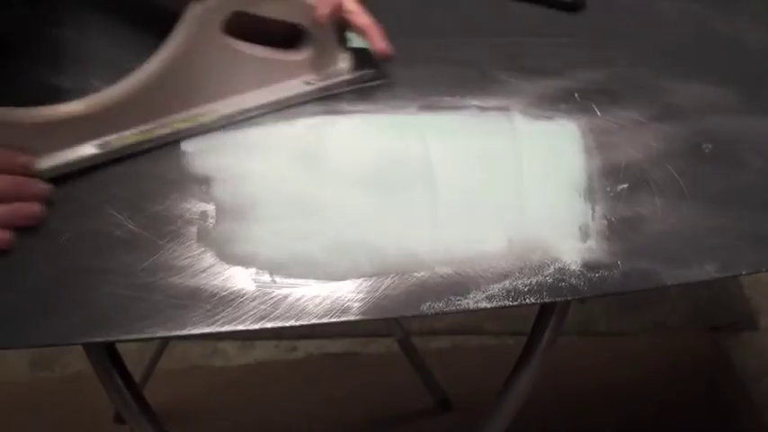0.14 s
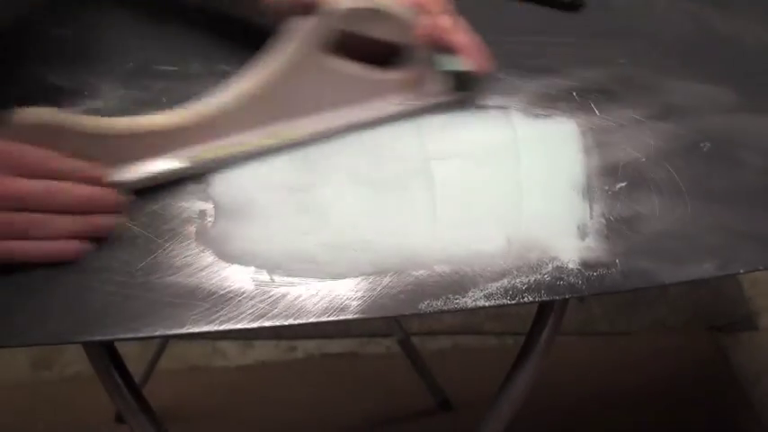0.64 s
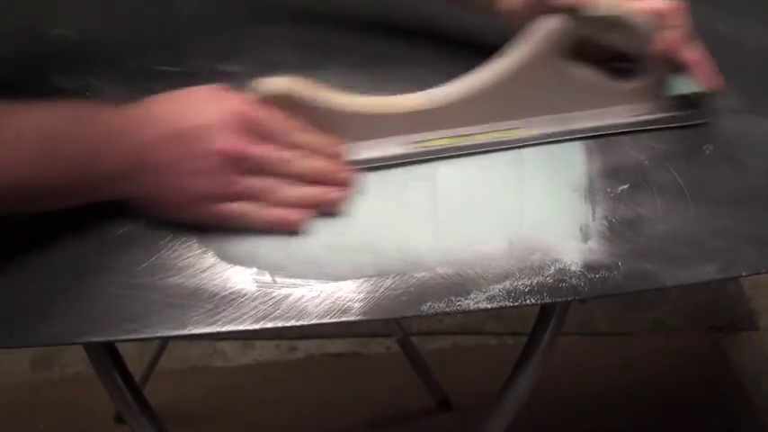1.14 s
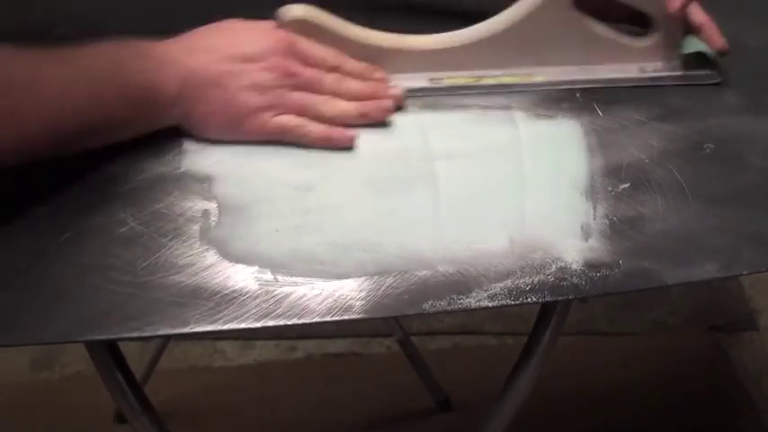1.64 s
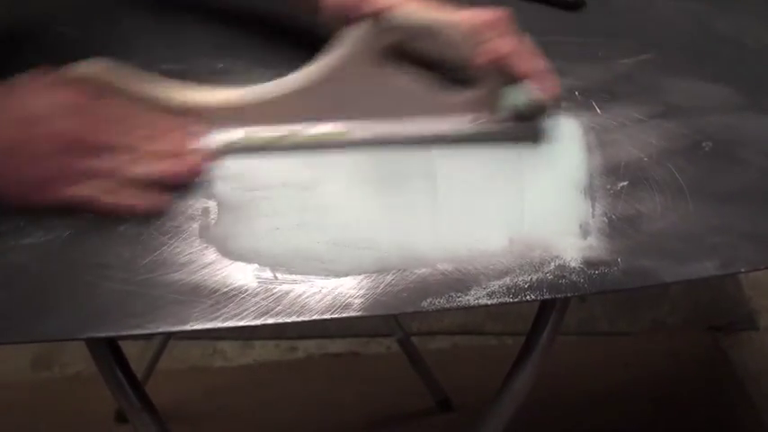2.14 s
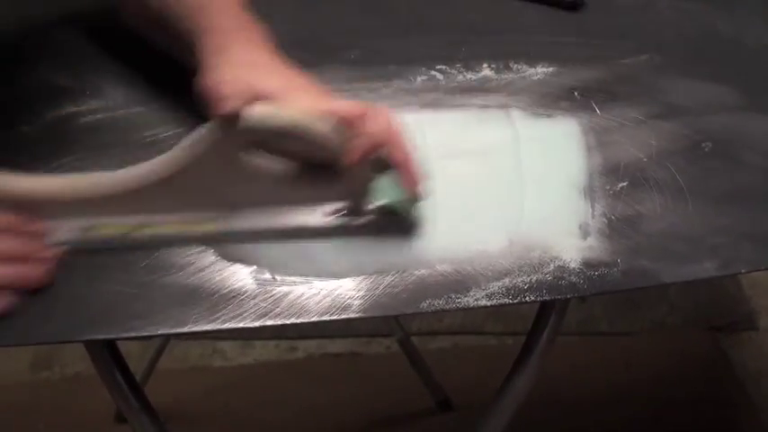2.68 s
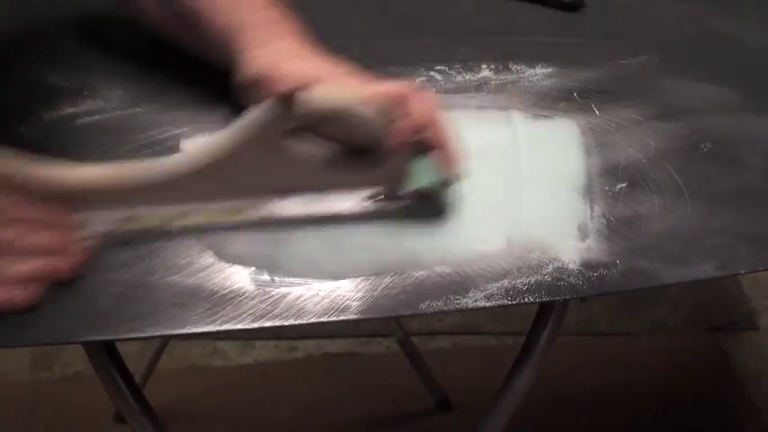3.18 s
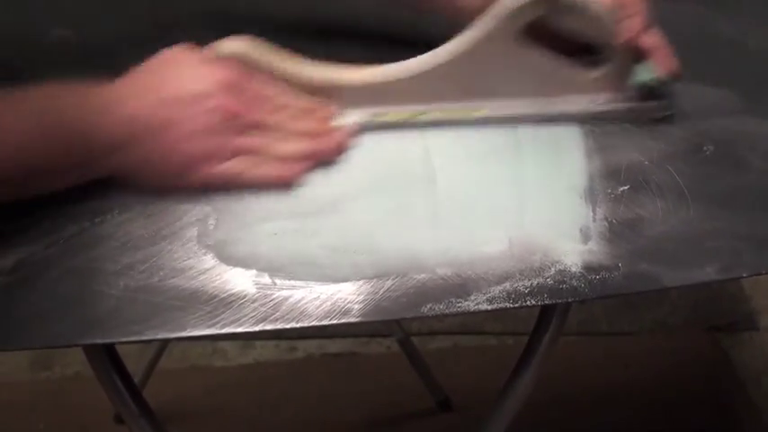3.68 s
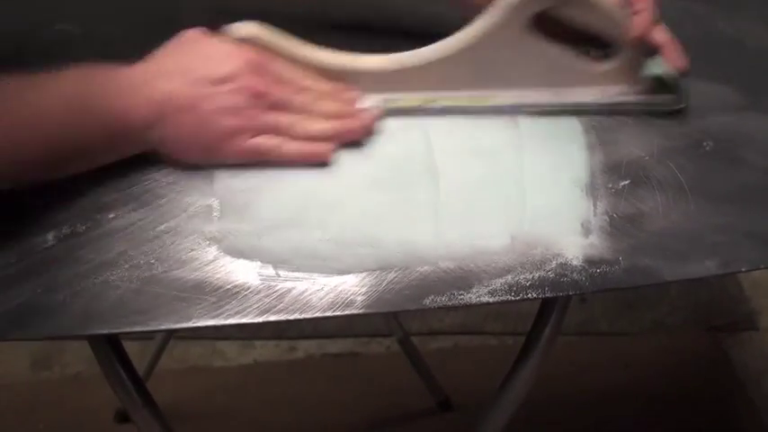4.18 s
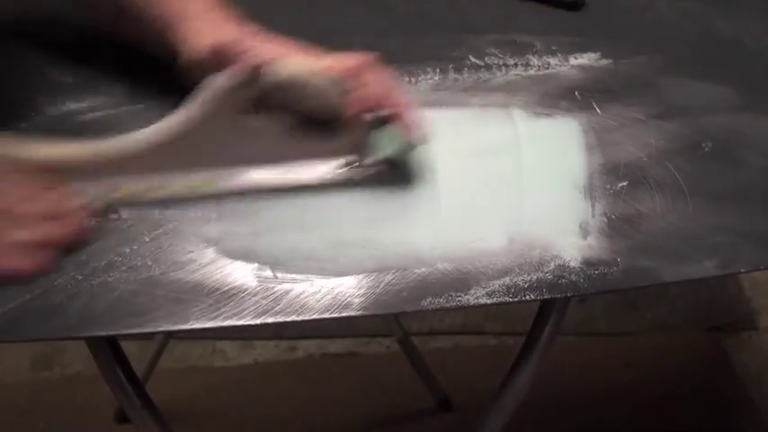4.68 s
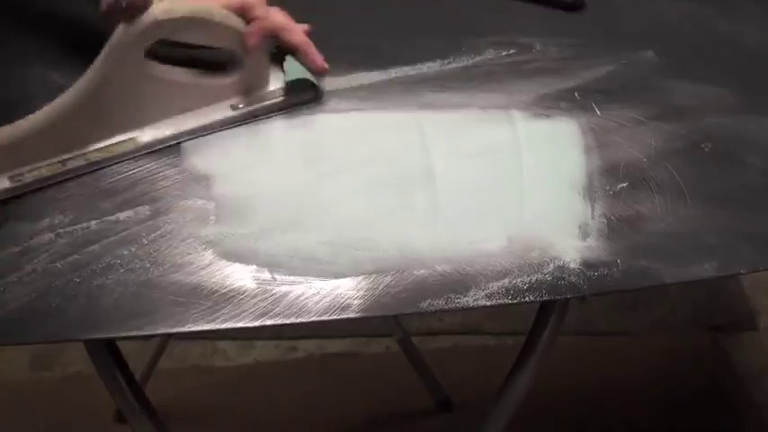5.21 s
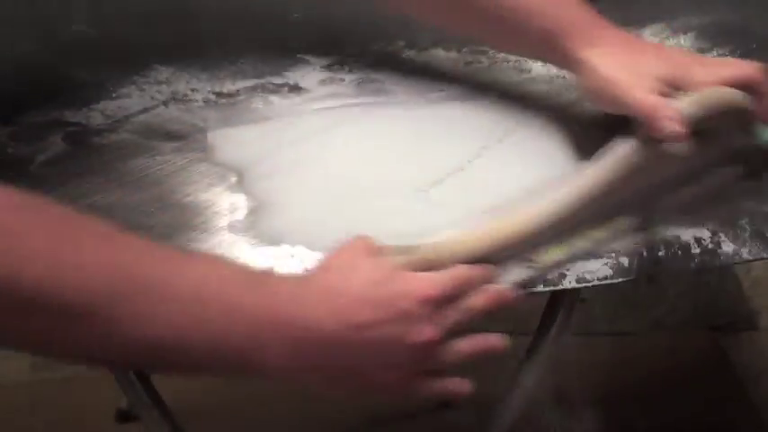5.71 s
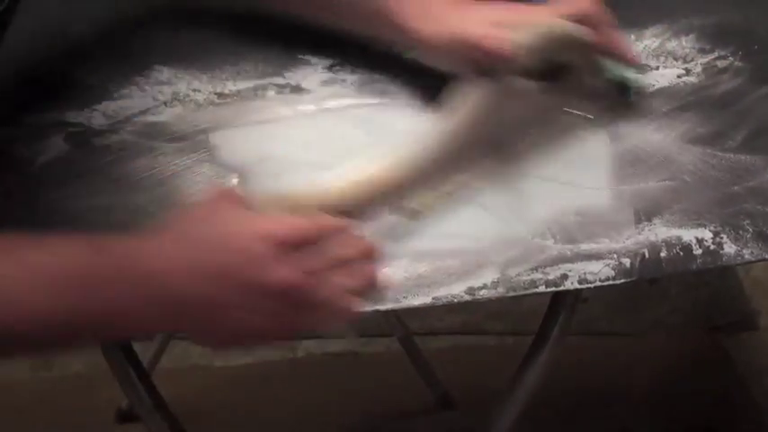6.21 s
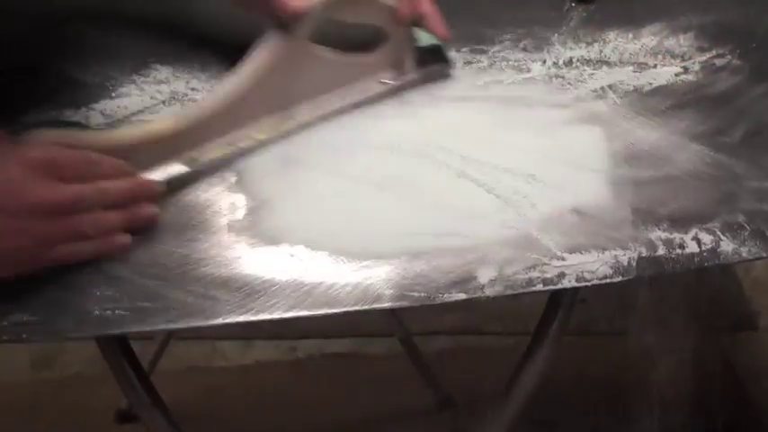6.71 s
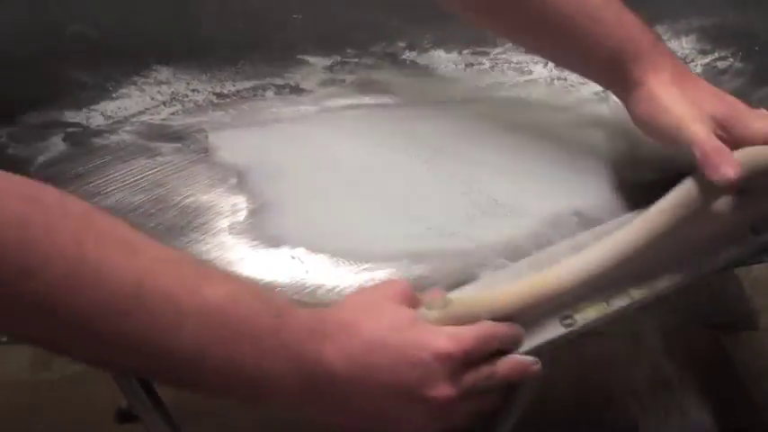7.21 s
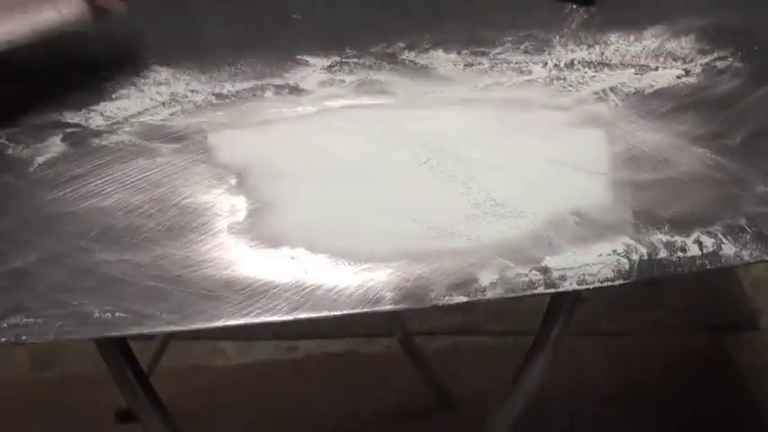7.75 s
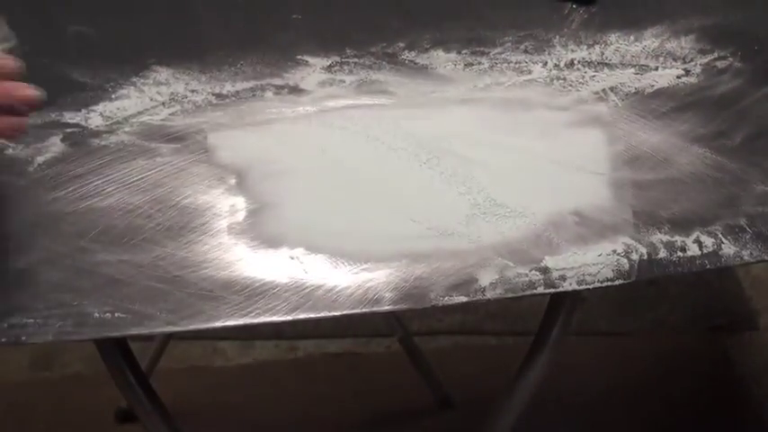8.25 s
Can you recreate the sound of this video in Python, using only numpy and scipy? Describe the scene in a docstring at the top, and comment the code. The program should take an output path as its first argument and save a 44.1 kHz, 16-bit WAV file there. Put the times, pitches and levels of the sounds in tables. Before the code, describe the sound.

In a small workshop, heard close up, coarse grit scrubs steadily across filled sheet metal, each stroke swelling and dipping at the turn. Brief squealing scrapes and a few sharp clacks poke through, with a faint humming stand beneath. The strokes soften, stop, and the tool is laid aside with light knocks, a clear clack, a dull thud and a short drag.

```python
"""Workshop: a long sanding block is pushed and pulled over hardened filler on a sheet-metal panel. Noise broken
up by random grit catches, banded and levelled along each stroke, gives hiss, rasp and rumble; narrow noise
gives passing squeals, and two wavering sines the hum of the stand. A few clacks (noise into ringing modes)
sound during the strokes, more as the block is lifted and laid aside with a soft thud. Last, something is
dragged nearby, one knock thudding low; diffuse echoes and steady air noise surround it all."""
import sys
import numpy as np
from scipy import signal
from scipy.io import wavfile

SR = 44100
rng = np.random.default_rng(int(sys.argv[2]) if len(sys.argv) > 2 else 0)


def boost(x):
    """Linear amplitude factor 10**(x/20) for a level x in decibels (scalar or array-like)."""
    u = np.asarray(x, float) / 20
    return 10 ** u


def transcribe(signal):
    """Save signal, clipped to [-1, 1], as a 16-bit WAV file at the path in sys.argv[1]."""
    frames = np.atleast_2d(signal).T
    limited = np.clip(frames, -1, 1)
    pcm = np.round(limited * 32767).astype(np.int16)
    wavfile.write(sys.argv[1], SR, pcm)


N = 369108

# push and pull strokes in turn: starting turn t/s, grit hiss level/dB, place of loudest hiss [0-1 of stroke],
# panel rasp level/dB, place of loudest rasp [0-1 of stroke]
STROKES = [(-0.1, -16.5, 0.48, -13, 0.24), (0.214, -16, 0.41, -23, 0.84), (0.535, -15, 0.55, -13, 0.19),
           (0.848, -13, 0.45, -17.5, 0.68), (1.149, -14.5, 0.41, -14, 0.65),
           (1.488, -14, 0.48, -13.5, 0.13), (1.789, -14.5, 0.37, -16, 0.65), (2.096, -14.5, 0.53, -19, 0.4),
           (2.4, -13.5, 0.15, -16.5, 0.59), (2.724, -12.5, 0.98, -12.5, 0.39),
           (3.048, -15.5, 0.27, -17, 0.54), (3.379, -15.5, 0.52, -14.5, 0.23),
           (3.692, -14.5, 0.33, -15, 0.64), (4.032, -15.0, 0.65, -14, 0.41), (4.352, -13.5, 0.3, -15, 0.62),
           (4.688, -14.0, 0.43, -14.0, 0.22), (4.999, -17, 0.4, -21, 0.5), (5.338, -18, 0.12, -19.5, 0.36),
           (5.727, -25.5, 0.3, -21.5, 0.45), (6.137, -20, 0.21, -19.5, 0.44),
           (6.51, -20.5, 0.42, -18.5, 0.4), (6.894, -19.5, 0.64, -18.5, 0.36)]
LIFT_S = 7.284   # end of the last stroke


def sanding():
    """The same grit catches feed the hiss in the air and the rasp and rumble of the sheet."""
    # spectra: f/Hz, relative density level/dB per Hz (grit: at full speed)
    grit_spectrum = [(2350, -54), (4000, 7), (6310, 7.5), (9720, 7.5), (12700, 2.5), (15600, -5)]
    rasp_spectrum = [(800, -24), (1300, -12), (2000, 2.5), (2700, 3.5), (3400, 7.5), (3800, 4.5),
                     (4400, -1.5), (6000, -4.5)]
    rumble_spectrum = [(100, -51), (170, -8.5), (300, -7), (370, 0.5), (491, 1), (777, -1), (1600, -1),
                       (2080, -68)]
    # following the stroke: speed-up/s, slow-down/s, power of speed, loss off the loudest place/dB per stroke,
    # level at a turn/dB, fade after the lift/dB per s
    grit_rule = (0.0274, 0.0429, 3, 9.5, -38, 142)
    rasp_rule = (.021, 0.031, 2.9, 21.5, -30.5, 108)
    # rasp colour, dull to bright: t/s, tilt/dB per octave
    rasp_tilt = [(0, 0), (2.9, -0.5), (5.5, 2), (5.92, 1), (6.68, 1), (6.83, 1.5), (7.0, 6), (7.19, -2)]
    # grit bites harder, rasp swells: t/s, half length/s, extra level/dB
    bites = [(.385, .1, 9.5), (.88, 0.084, 7), (1.219, 0.037, 5), (2.212, 0.018, 6), (5.91, 0.055, 6.5),
             (7.202, 0.038, 6)]
    # hands lean in, rumble swells: t/s, extra level/dB
    leans = [(.03, 6.5), (.43, 7.5), (.64, 4), (1.14, 7.5), (1.27, 7.5), (1.94, 3.5), (2.57, 3.5),
             (3.15, 7), (3.85, 4.5), (4.54, 4), (6.42, 6.5), (7.19, 6.5)]
    lean_half_s = 0.069
    rumble_base_db, rumble_share_of_swing, rumble_fade_db_per_s = -35, 0.31, 35
    full_speed_db, dulling_per_octave = -14, 0.44   # dulling: dB per octave for each dB below full speed
    surge_db = 1.16   # spread of the rasp's quick uneven surges

    _, grit_peaks, grit_places, rasp_peaks, rasp_places = np.transpose(STROKES)
    grit_db = along_strokes(grit_peaks, grit_places, grit_rule)
    rasp_db = along_strokes(rasp_peaks, rasp_places, rasp_rule)
    catches = grains(per_s=2000.0, spread_db=7.0, grain_s=0.00023, share=0.094)

    # slow grit loses its top first
    slowing_tilt = dulling_per_octave * np.clip(grit_db - full_speed_db, -30, 5)
    grit = boost(grit_db) * coloured(catches, grit_spectrum, 1.8, 12., slowing_tilt, pivot_hz=7840)

    uneven_db = rasp_db + swells(bites) + surge_db * drift(21.0)
    rasp = coloured(catches, rasp_spectrum, 1.33, 25.0, in_time(rasp_tilt), pivot_hz=2750)
    rasp = boost(uneven_db) * rasp

    turn_db = rasp_rule[4]
    swing_db = np.maximum(rasp_db, turn_db) - rasp_peaks.mean()
    leaning_db = swells([(s, lean_half_s, db) for s, db in leans])
    lifted_s = np.maximum(np.arange(N) / SR - LIFT_S, 0)
    rumble_db = rumble_base_db + rumble_share_of_swing * swing_db + leaning_db
    rumble_db = rumble_db - rumble_fade_db_per_s * lifted_s
    rumble = boost(rumble_db) * coloured(catches, rumble_spectrum, 1.8, 4.8)
    return grit + rasp + rumble


def along_strokes(peaks_db, places, rule):
    """Level/dB per sample: follows the block's speed and peaks at one place along each stroke."""
    # the block rests a moment at some turns: t/s, half length/s, dip/dB
    rests = [(.225, 0.066, 3.5), (.52, 0.033, 3.5), (.86, 0.043, 4.5), (1.77, .025, 3), (2.11, 0.045, 4.5),
             (5.35, 0.028, 7), (6.51, 0.037, 3.5), (6.905, 0.039, 6.5)]
    rise_s, fall_s, power, loss_db, turn_db, fade_db_per_s = rule
    t = np.arange(N) / SR
    turns = np.append(np.array(STROKES)[:, 0], LIFT_S)
    k = np.minimum(np.searchsorted(turns, t, "right"), len(STROKES)) - 1   # current stroke
    since = t - turns[k]
    until = np.maximum(turns[k + 1] - t, 0)
    speed = np.tanh(since / rise_s) * np.tanh(until / fall_s)
    away = np.hypot(since / np.diff(turns)[k] - places[k], .03)   # share of stroke, rounded at the peak
    ringing = boost(turn_db - fade_db_per_s * np.maximum(t - LIFT_S, 0))
    moving = boost(peaks_db[k] - loss_db * away) * speed ** power
    return 20 * np.log10(ringing + moving) - swells(rests)


def squeals():
    """The scrape narrows briefly onto one pitch: narrow noise that swells and fades."""
    # t/s, length/s, f/Hz, level/dB
    pitches = [(0.336, 0.18, 2560, -15.5), (.56, 0.17, 2650, -19.5), (2.445, .14, 5050, -22),
               (5.014, 0.15, 5100, -20.5), (6.169, 0.22, 6250, -23), (6.17, 0.15, 3180, -23.5),
               (6.622, 0.11, 2620, -19.5), (6.755, 0.069, 6300, -19), (6.79, 0.1, 3160, -22.5),
               (6.927, 0.094, 3350, -21)]
    t, out = np.arange(N) / SR, 0
    for s, length_s, hz, db in pitches:
        swell = np.sin(np.pi * np.clip((t - s) / length_s, 0, 1) ** .7)
        out = out + boost(db) * swell * whistle(hz, width_hz=0.21 * hz)
    return out


def stand():
    """Two low modes swell at shoves and hum on between them; the steady hum drops by 6 dB at 5.4 s."""
    # shoves exciting each mode: t/s, level/dB
    first_shoves = [(.15, -48), (2.32, -43), (2.95, -46), (3.62, -46), (4.28, -47.5), (4.52, -44),
                    (4.8, -48), (5.15, -46), (6.02, -41), (7.39, -38.5)]
    second_shoves = [(1.4, -49), (2.0, -53), (2.72, -45.5), (3.41, -46), (3.9, -49.5), (4.7, -50)]
    first_hz, second_hz, waver_hz = 129.6, 222.2, 5.
    shove_half_s, rest_db, fainter_from_s = 0.067, -55, 5.4
    resting = boost(rest_db) * boost(-6 * (np.arange(N) / SR > fainter_from_s))
    first = swells([(s, shove_half_s, boost(db)) for s, db in first_shoves]) + resting
    second = swells([(s, shove_half_s, boost(db)) for s, db in second_shoves]) + resting
    return first * hum(first_hz, waver_hz) + second * hum(second_hz, waver_hz)


def clacks():
    """Each clack is a short chatter into the block's modes, favouring those near its main ring."""
    # clacks of block and clamp: t/s, peak level/dB, chatter length/s, main ring f/Hz, ring t60/s
    knocks = [(1.834, -12, 0.011, 3450, .01), (2.102, -11.5, .006, 2970, .015),
              (4.699, -11.5, .006, 3420, 0.013), (7.477, -34, 0.013, 7840, 0.01),
              (7.569, -38, .01, 7520, .3), (7.57, -33, 0.033, 2500, .01), (7.692, -30, .006, 2200, 0.033),
              (7.757, -39, .07, 4200, .002), (7.774, -29.5, 0.02, 3880, .02),
              (7.901, -17, 0.021, 3300, 0.008), (7.92, -31, .08, 3100, 0.011)]
    # block modes: f/Hz, level/dB, t60/s
    block_modes = [(950, -6, .025), (1680, -1, .015), (2750, -2, .013), (3500, -2, .015), (4180, -6, .012)]
    out, size = np.zeros(N), SR // 4
    age = np.arange(size) / SR
    contact = signal.butter(2, (860, 11000), "band", fs=SR, output="sos")   # knocking band, Hz
    for s, db, length_s, main_hz, main_t60 in knocks:
        decay = boost(-30 * (age / length_s) ** 2.2)
        chatter = signal.sosfilt(contact, rng.standard_normal(size)) * np.tanh(age / 0.001) * decay
        body = 0
        for hz, mode_db, t60 in block_modes:
            weight = boost(mode_db - 5.3 * abs(np.log2(hz / main_hz)))
            body = body + weight * rms_one(ring(chatter, hz, t60))
        main = rms_one(ring(chatter, main_hz, main_t60))
        sound = rms_one(body) + 1.3 * main + 0.8 * rms_one(chatter)
        at = round(s * SR)
        out[at:at + size] += (boost(db) * sound / np.abs(sound).max())[:N - at]
    return out


def thud():
    """Soft, rattling thuds: decaying noise rings the bench's low modes, once as the block lands, once as the
    dragged object knocks."""
    # thuds (the block's landing, then a knock of the dragged object): t/s, relative level/dB, t60/s
    low_thuds = [(7.538, -29.5, .65), (8.307, -30, .06)]
    # bench modes: f/Hz, level/dB, t60/s
    bench_modes = [(126, -2, .06), (234, 0.5, 0.064), (300, -2.5, 0.042), (500, 2, 0.031),
                   (1100, -6.5, 0.036)]
    t = np.arange(N) / SR
    force = sum((t > s) * boost(db - 60 * np.clip(t - s, 0, 2) / t60) for s, db, t60 in low_thuds)
    push = rng.standard_normal(N) * force / 30
    return sum(boost(db) * ring(push, hz, t60) for hz, db, t60 in bench_modes)


def drag():
    """Slow, coarse scrape: its one firm resonance gives way as it grows brighter and lumpier."""
    # course: t/s, level/dB
    course = [(8.128, -29.5), (8.37, -36)]
    # spectrum: f/Hz, relative density level/dB per Hz
    drag_spectrum = [(500, -17), (1080, -18), (1400, -4.5), (1850, -8), (2200, -6), (2550, -15), (3150, -6),
                     (4100, -19), (15000, -43)]
    # jolts over bumps: t/s, extra level/dB
    jolts = [(8.197, 4), (8.284, 7.3), (8.311, 7.3), (8.329, 9), (8.341, 7), (8.368, 6.2)]
    jolt_half_s, brightens_db_per_octave = .003, 3.5   # full tilt by the end
    start_s, end_s = course[0][0], course[-1][0]
    along = np.clip((np.arange(N) / SR - start_s) / (end_s - start_s), 0, 1)
    catches = grains(per_s=200., spread_db=1.9, grain_s=.003, share=.2)
    scrape = coloured(catches, drag_spectrum, 1.3, 18.0, brightens_db_per_octave * along, pivot_hz=2420)
    resonance = 0.6 * (1 - along ** 2) * whistle(hz=2200, width_hz=240)
    level_db = in_time(course) + swells([(s, jolt_half_s, db) for s, db in jolts])
    return boost(level_db) * (along > 0) * (scrape + resonance)


def workshop(x):
    """Diffuse echoes: a dull noise tail that dies away."""
    t60_s, wet_db, wall_cut_hz = 0.54, -16.5, 7200
    t = np.arange(SR) / SR
    dull = np.exp(-2 * np.pi * wall_cut_hz / SR)
    tail = signal.lfilter([1], [1, -dull], rng.standard_normal(SR))
    tail = tail * boost(-60 * t / t60_s) * (t > .01)
    return boost(wet_db) * signal.fftconvolve(x, tail / np.sqrt(np.sum(tail ** 2)))[:N]


def shop_air():
    """Steady air noise: coloured noise with a slight wander in each band."""
    # f/Hz, relative density level/dB per Hz
    air_spectrum = [(15, -42), (30, -13), (62, -4), (183, -10.5), (227, -11.5), (434, -10), (705, -30),
                    (1860, -15.5), (3550, -16), (4900, -28), (15600, -39)]
    return boost(-45) * coloured(rng.standard_normal((2, N)), air_spectrum, 0.24, 8.9)


def grains(per_s, spread_db, grain_s, share):
    """Two noises whose strength jumps together each time a grain of grit catches and tears free."""
    sizes = boost(spread_db * np.minimum(rng.exponential(1, N), 3.1)) * (rng.random(N) < per_s / SR)
    r = np.exp(-1 / (grain_s * SR))
    catch = rms_one(signal.lfilter([1], [1, -r], sizes))
    share = np.clip(share, 0, 1)   # of the power
    return rng.standard_normal((2, N)) * np.sqrt(1 - share + share * catch ** 2)


def coloured(noise, spectrum, patchy_db, patch_rate_hz, tilt_db=0, pivot_hz=1):
    """Sixth-octave bands, each with its level and own wandering; the tilt/dB per octave turns about a pivot."""
    hz, db = np.transpose(spectrum)
    steps = np.arange(0, np.log2(hz[-1] / hz[0]) + 1 / 6, 1 / 6)
    edges = np.minimum(hz[0] * 2 ** steps, 17000)
    out, power = 0, 0
    for k, (low, high) in enumerate(zip(edges, edges[1:])):
        bandpass = signal.butter(2, [low, high], "band", fs=SR, output="sos")
        band = signal.sosfilt(bandpass, noise[k % 2])   # neighbours use different noises
        band = band * boost(np.interp(np.log(low * high) / 2, np.log(hz), db))
        power += np.mean(band ** 2)
        out = out + band * boost(patchy_db * drift(patch_rate_hz) + tilt_db * np.log2(low / pivot_hz))
    return out / np.sqrt(power)


def whistle(hz, width_hz):
    """Noise twice through one resonance; rms 1."""
    r = np.exp(-np.pi * width_hz / SR)
    poles = [1, -2 * r * np.cos(2 * np.pi * hz / SR), r * r]
    once = signal.lfilter([1, 0, -1], poles, rng.standard_normal(N))
    return rms_one(signal.lfilter([1], poles, once))


def hum(hz, waver_hz):
    """A mode kept ringing by small shakes: its pitch and strength waver; rms about 1."""
    strength = np.sqrt(2) * boost(1.8 * drift(20.))
    return strength * np.sin(2 * np.pi * np.cumsum(hz + waver_hz * drift(25.)) / SR)


def ring(clicks, hz, t60):
    """A two-pole mode: a unit click starts a decaying sine of height 1."""
    r, w = boost(-60 / (t60 * SR)), 2 * np.pi * hz / SR
    return signal.lfilter([0, np.sin(w)], [1, -2 * r * np.cos(w), r * r], clicks + 1e-18)


def swells(rows):
    """Bell-shaped rises (t/s, half length/s, height), summed."""
    t = np.arange(N) / SR
    return sum(height * np.exp(-((t - s) / half_s) ** 2) for s, half_s, height in rows)


def drift(rate_hz):
    """Slow random wander of spread 1: noise through a double pole, computed every 40 samples."""
    r = np.exp(-80 * np.pi * rate_hz / SR)
    slow = signal.lfilter([1], [1, -2 * r, r * r], rng.standard_normal(N // 40 + 2002))[2000:]
    return np.interp(np.arange(N) / 40, np.arange(len(slow)), rms_one(slow))


def in_time(rows):
    """A curve's value at every sample."""
    return np.interp(np.arange(N) / SR, *np.transpose(rows))


def rms_one(x):
    """Scales to rms 1."""
    return x / np.sqrt(np.mean(x ** 2) + 1e-20)


def scene():
    """Everything but the stand's hum and the air echoes in the shop; both channels are alike."""
    near = sanding() + squeals() + clacks() + thud() + drag()
    return np.tile(near + workshop(near) + stand() + shop_air(), (2, 1))


def band_limit(x):
    """A steep low-pass at the top of the band."""
    return signal.sosfilt(signal.butter(12, 15750, fs=SR, output="sos"), x)


def record(dry):
    """Soft saturation rounds the tallest peaks."""
    mix = 1.274 * np.tanh(dry / 1.229)
    return band_limit(mix)


dry = scene()
out = record(dry)
transcribe(out)
```